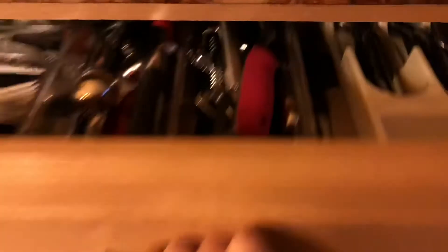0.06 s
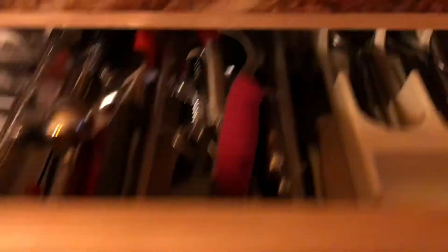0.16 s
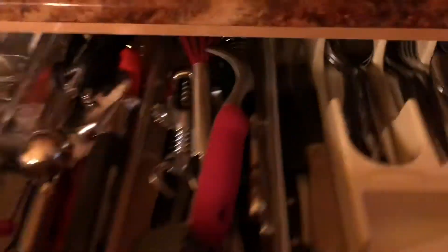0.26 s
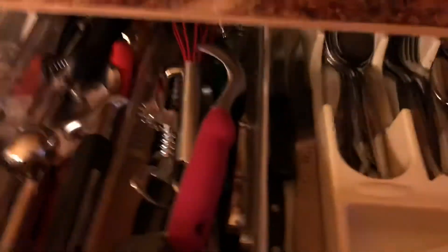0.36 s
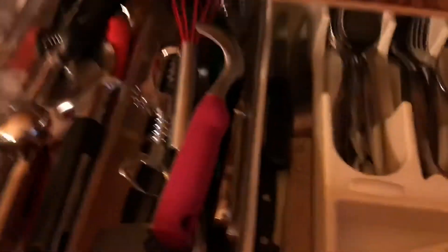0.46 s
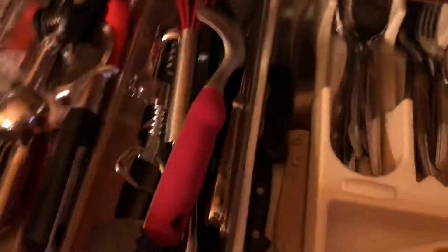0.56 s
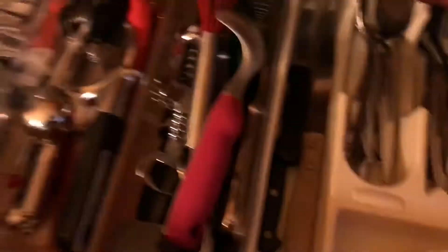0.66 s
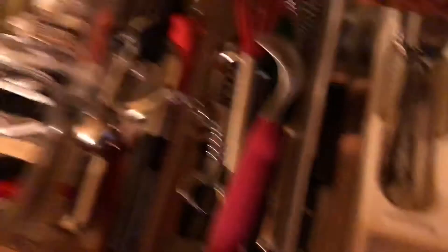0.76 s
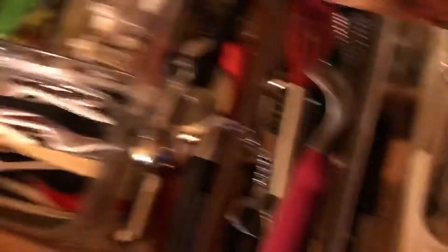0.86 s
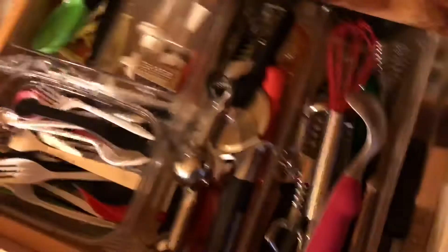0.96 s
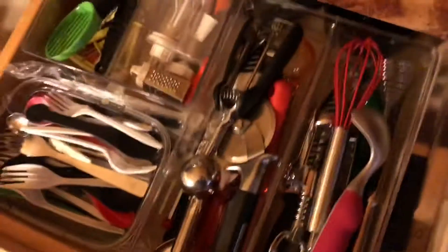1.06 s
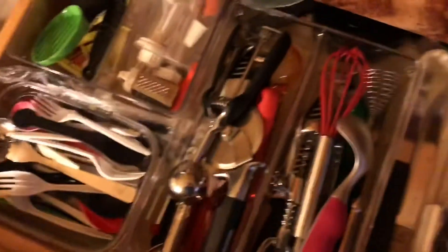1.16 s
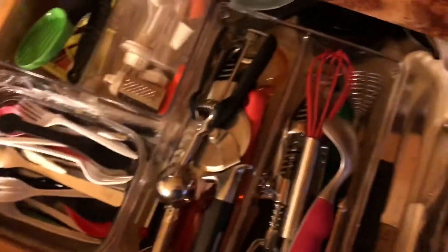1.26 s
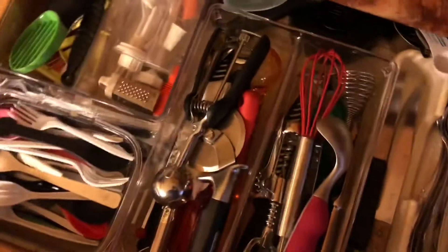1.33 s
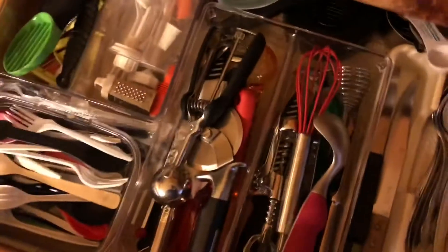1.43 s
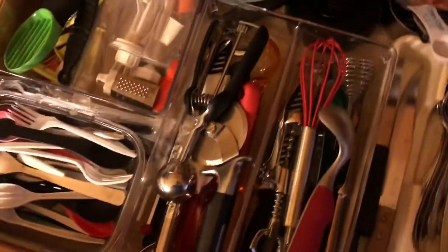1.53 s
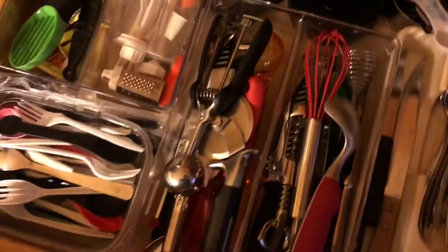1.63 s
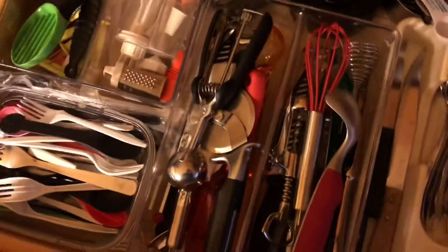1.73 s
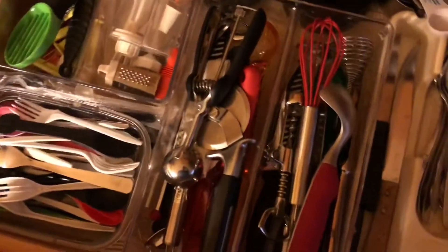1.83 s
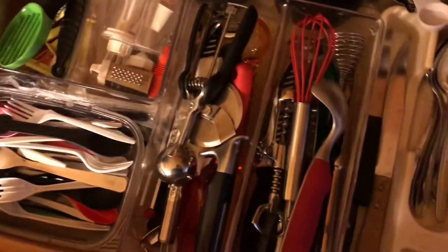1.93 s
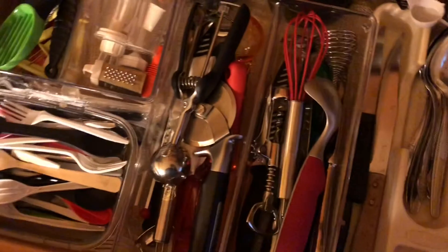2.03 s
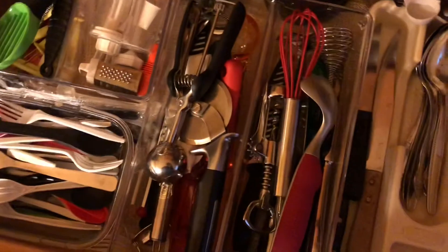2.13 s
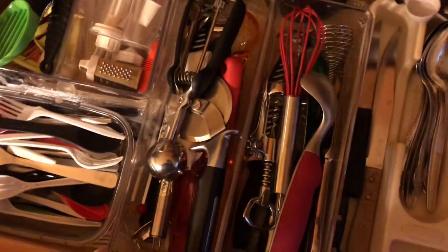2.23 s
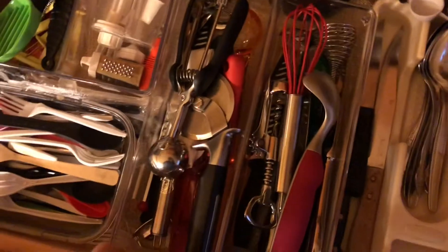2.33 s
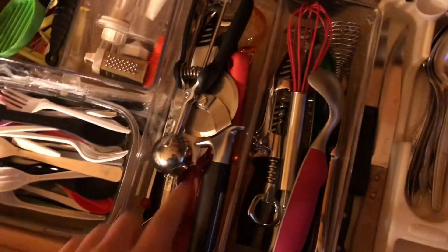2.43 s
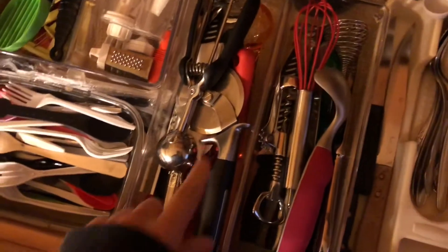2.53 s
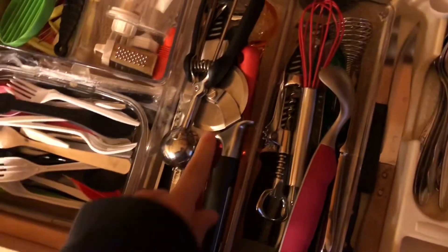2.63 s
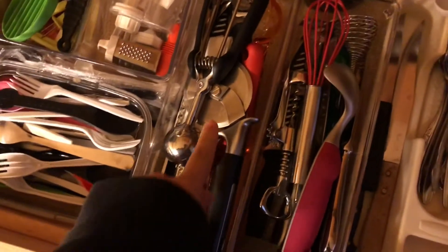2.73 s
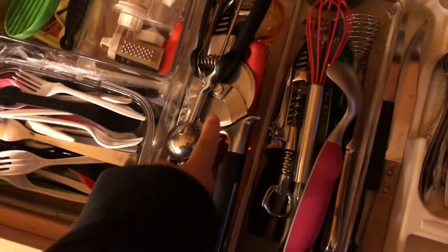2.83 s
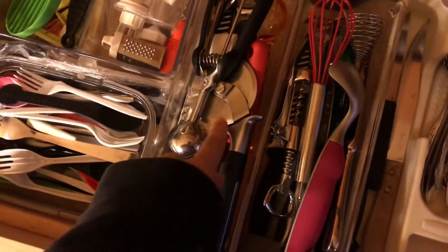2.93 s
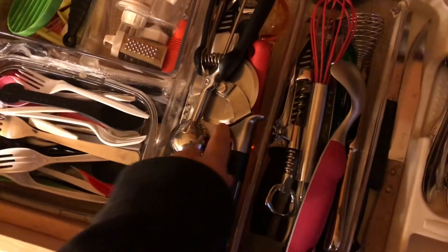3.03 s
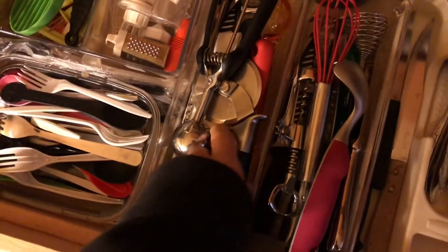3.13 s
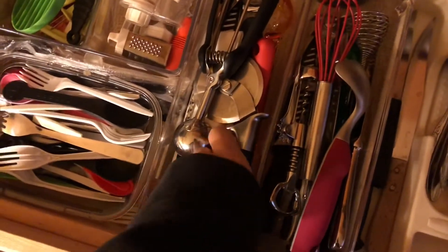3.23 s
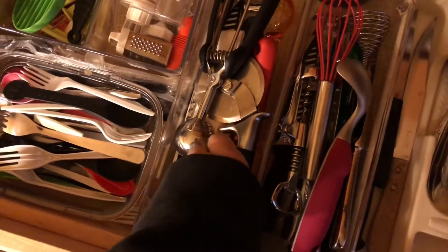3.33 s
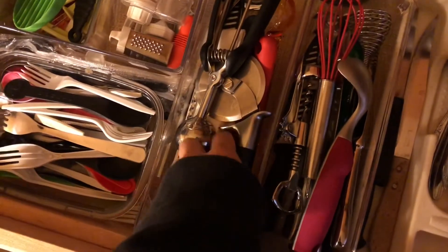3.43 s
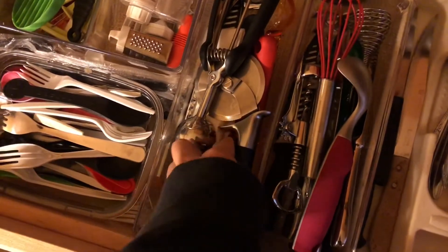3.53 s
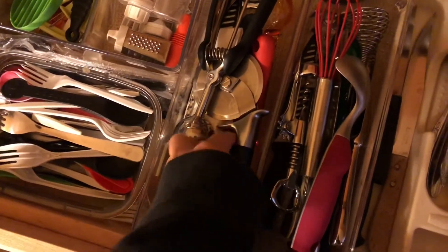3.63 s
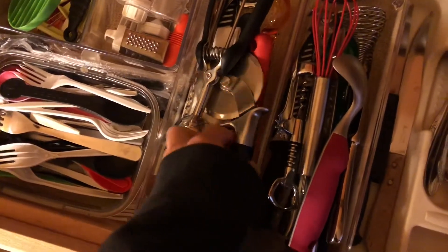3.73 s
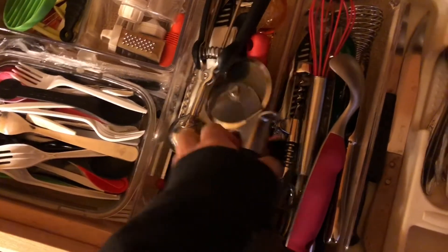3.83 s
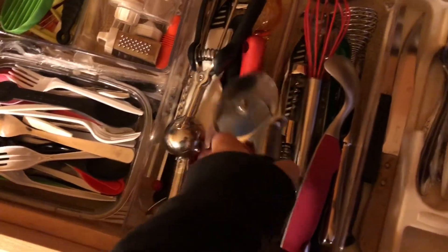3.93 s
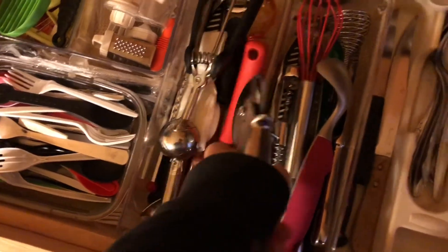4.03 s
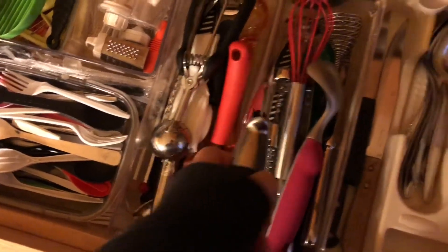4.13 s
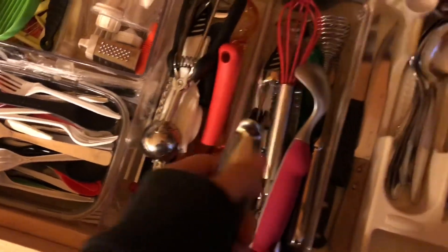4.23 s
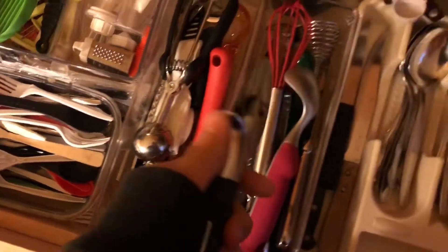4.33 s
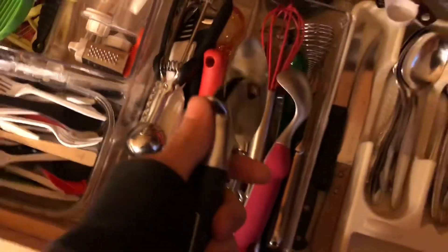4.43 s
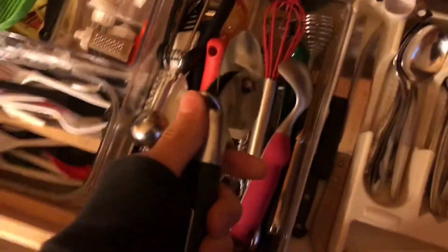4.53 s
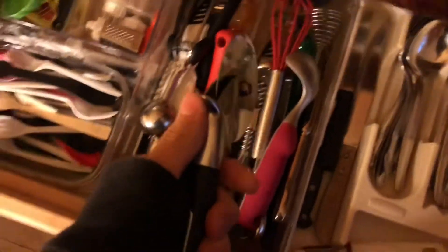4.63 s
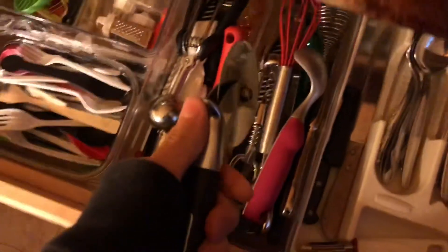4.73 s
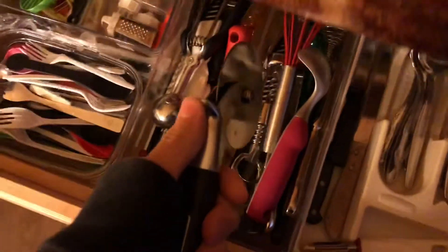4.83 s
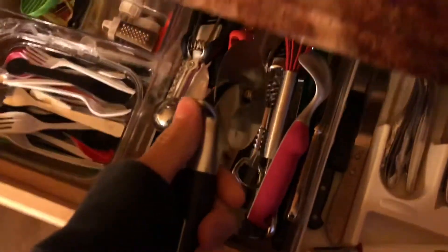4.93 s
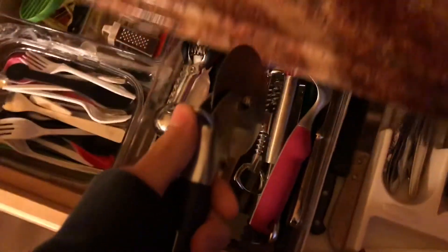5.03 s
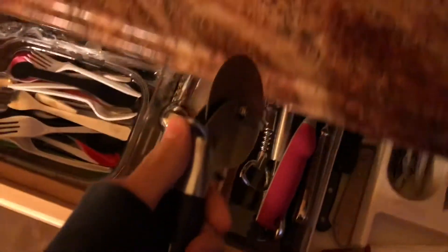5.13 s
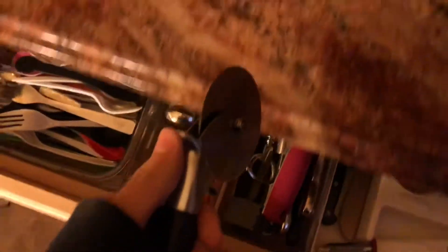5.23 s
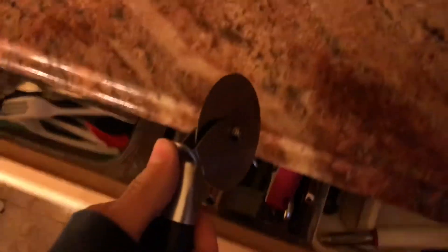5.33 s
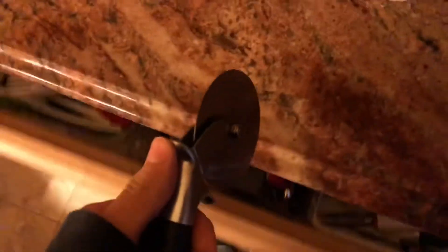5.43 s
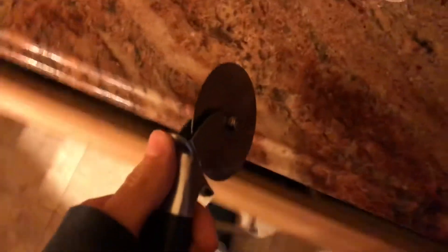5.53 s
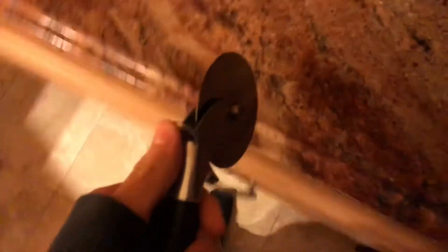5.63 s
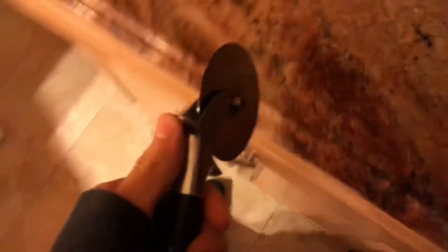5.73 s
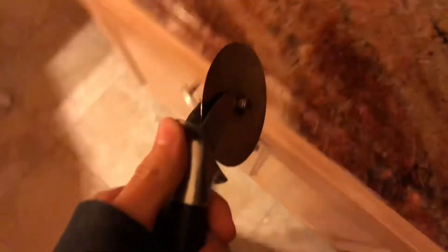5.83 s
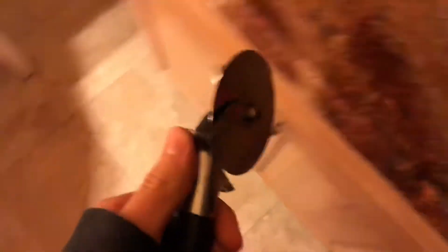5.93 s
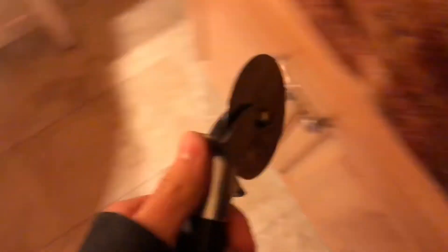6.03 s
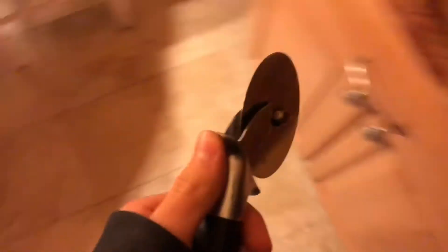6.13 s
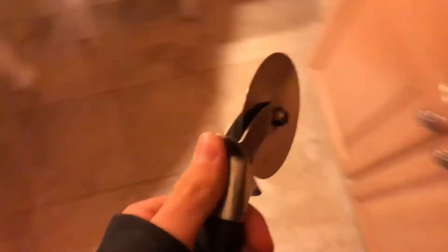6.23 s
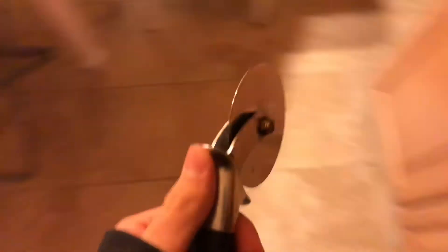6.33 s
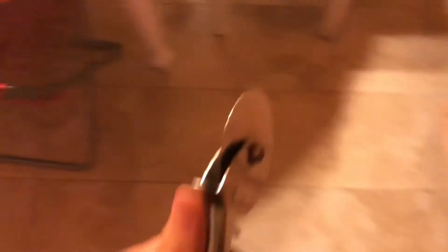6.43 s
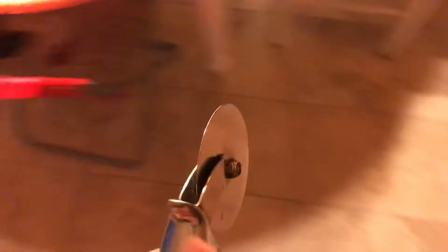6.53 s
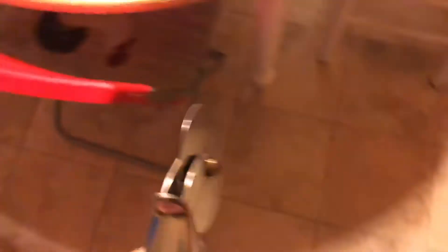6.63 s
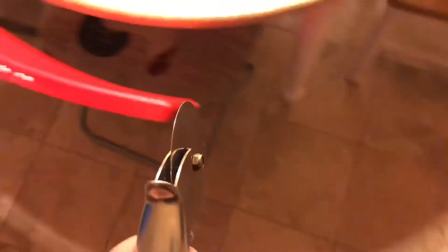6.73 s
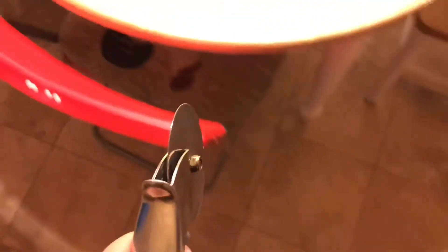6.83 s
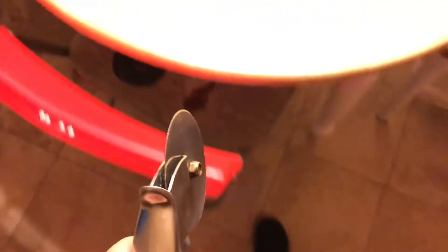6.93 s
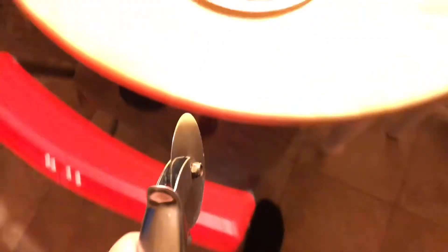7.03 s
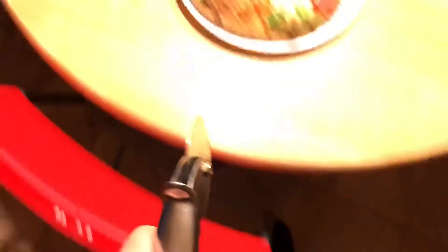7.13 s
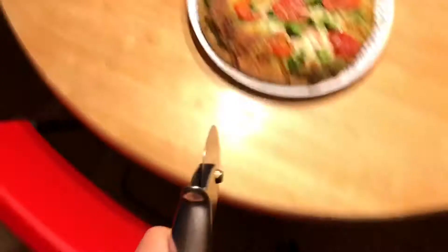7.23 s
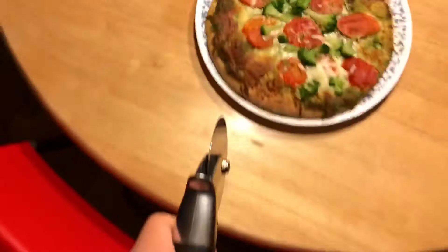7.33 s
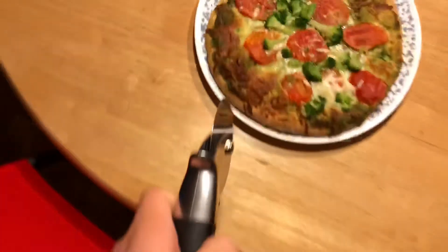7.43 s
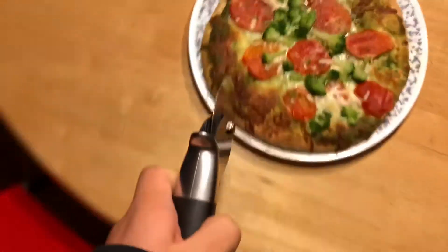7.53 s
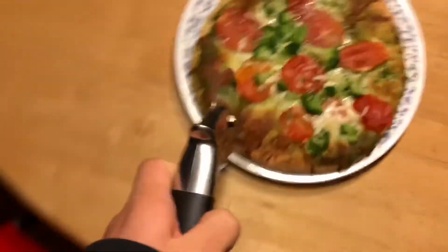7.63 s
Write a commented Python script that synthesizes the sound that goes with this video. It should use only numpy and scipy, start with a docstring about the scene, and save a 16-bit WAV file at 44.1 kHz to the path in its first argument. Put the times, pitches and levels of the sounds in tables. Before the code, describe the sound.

A quiet kitchen with low hum and soft floor booming, heard close up with a short hard-room reverberation. From 0 s a wooden drawer rolls open with rough rumbling and rattling, a sharp knock at about 0.65 s and soft bumps until about 1.5 s. Near-silence follows. At 3.2 to 3.6 s fingers make small clinks and clicks among steel utensils. From 3.8 s the rummaging thickens into bright clatter, peaking in a loud double clash at 4.2 s. A thin steel disc is left ringing, high and clear with a fast shimmer, swelling around 4.5 s and fading slowly until about 7 s. More clinks come at 4.5 to 4.7 s. The drawer rumbles shut, ending in a thud and rattle near 5.75 s. A light, hard shoe step falls at 6.4 s, a duller one at 7.5 s.

```python
"""A wooden kitchen drawer rolls open close by, over the low hum of a quiet kitchen: rubbing is flickering noise.
A hand then digs among steel utensils (noise bursts with damped bodies) and pulls out a cutting wheel, whose thin
disc rings on for seconds and swells as it turns: sinusoidal modes, some in beating pairs. The drawer rolls shut
with a thud and a rattle, then come two shoe steps on tiles. Low noise booms as weight shifts on the floor."""
import sys
import numpy as np
from scipy import signal
from scipy.fft import rfft, irfft, next_fast_len
from scipy.io import wavfile
from scipy.ndimage import uniform_filter1d

SR = 44100
rng = np.random.default_rng(int(sys.argv[2]) if len(sys.argv) > 2 else 0)


def level_to_linear(level):
    """Convert decibel levels to linear amplitude factors, elementwise."""
    exponent = np.asarray(level, float) / 20
    return 10 ** exponent


def generate_wav(sig):
    """Save sig (samples, or channels by samples) to the path in sys.argv[1] as 16-bit PCM at SR."""
    pcm = np.round(np.clip(np.atleast_2d(sig).T, -1, 1) * 32767).astype(np.int16)
    wavfile.write(sys.argv[1], SR, pcm)


N = 337806
T = np.arange(N) / SR  # time in s


def unit(x):
    """Normalization: divide by the root mean square, leaving rms 1."""
    return x / np.sqrt(np.mean(x ** 2))


def band(x, lo_hz, hi_hz):
    """Band limitation: a Butterworth band-pass keeps one range of frequencies."""
    sos = signal.butter(2, [lo_hz, min(hi_hz, .45 * SR)], "band", fs=SR, output="sos")
    return signal.sosfilt(sos, x)


def colour(x, points):
    """Spectral shaping: weight the spectrum by (f/Hz, level/dB) points, then normalize to rms 1."""
    hz, db = np.transpose(points)
    size = next_fast_len(len(x))
    bin_hz = np.arange(size // 2 + 1) * SR / size
    gain = level_to_linear(np.interp(np.log(bin_hz + 1), np.log(hz), db))  # + 1 avoids log(0)
    return unit(irfft(rfft(x, size) * gain, size)[:len(x)])


def curve(rows, column):
    """Amplitude envelope: a level column as gain over time, silent outside its span, smoothed over 10 ms."""
    rows = np.array(rows)
    level_db = np.interp(T, rows[:, 0], rows[:, column], left=-150, right=-150)
    return uniform_filter1d(level_to_linear(level_db), size=SR // 100)


def walk(rate):
    """Slow random modulation: levels drawn rate times a second, averaged twice over one step, rms 1."""
    k = int(SR / rate)
    held = np.repeat(rng.standard_normal(N // k + 1), k)
    return unit(uniform_filter1d(uniform_filter1d(held, k), k)[:N])


def add(track, s, sound, db):
    """Linear superposition: add a sound at time s, scaled so that its peak is db."""
    i = int(s * SR)
    sound = sound[:N - i]
    track[i:i + len(sound)] += level_to_linear(db) * sound / np.max(np.abs(sound))


def catches(rate, spread_db):
    """Stick-slip friction: dense small catches of uneven size, as noise whose level flickers at two rates."""
    return rng.standard_normal(N) * level_to_linear(spread_db * walk(rate) + spread_db * walk(8 * rate))


def rubbing():
    """Friction noise by frequency range: rollers rumble in the wood, loose things rattle, surfaces hiss."""
    # drawer runners, sleeve and shoes rubbing, in two passages:
    # t/s, rumble level/dB, rattle level/dB, hiss level/dB
    rub_passages = [
        [(0, -45.5, -50, -59.5), (.38, -51, -59.5, -61.5), (.46, -54.5, -65, -68.5), (.7, -61.5, -62.5, -71),
         (.85, -55, -68, -67), (1.0, -49.5, -67.5, -67.5), (1.2, -57, -61, -67), (1.33, -64, -81.5, -68.5),
         (1.52, -68, -60.5, -77.5), (1.68, -86, -91, -80)],
        [(3.69, -68, -68.5, -76), (3.78, -49.5, -54.5, -67), (3.84, -53, -39, -48.5), (3.95, -59.5, -56, -46),
         (4.17, -46, -40, -60), (4.27, -55.5, -42, -57), (4.42, -70, -71.5, -90), (4.5, -57, -61, -62),
         (4.58, -43.5, -49, -49.5), (4.72, -50, -69, -72), (4.95, -51.5, -67.5, -72), (5.22, -47.5, -47, -68),
         (5.42, -47.5, -62, -69), (5.68, -55, -70, -69.5), (5.78, -40.5, -46, -52), (5.88, -56, -54.5, -56.5),
         (6.0, -78.5, -76.5, -79), (6.35, -72, -74.5, -72.5), (6.6, -64, -61.5, -72), (7.05, -71, -88.5, -70),
         (7.45, -77, -72, -72.5), (7.66, -51, -58, -62)],
    ]
    # colour of the rolling drawer: f/Hz, relative level/dB
    rumble_colour = [(29, -47), (50, -18), (92, -9.5), (302, 2), (418, -3.5), (800, -13.5), (1040, -10),
                     (1760, -120)]
    # colour of the hissing surfaces: f/Hz, relative level/dB
    hiss_colour = [(1400, -4), (2500, 3.5), (6000, -0.5), (16000, -6.5)]
    rumble = colour(catches(20, spread_db=1.0), rumble_colour)
    rattle = unit(band(band(catches(25, spread_db=2.24), 480, 1360), 400, 1750))
    hiss = colour(catches(30, spread_db=1.5), hiss_colour)
    return sum(curve(r, 1) * rumble + curve(r, 2) * rattle + curve(r, 3) * hiss for r in rub_passages)


def kitchen_hum():
    """Stationary coloured noise under slow amplitude modulation: the low hum of a quiet kitchen."""
    # colour of the kitchen hum: f/Hz, relative level/dB
    hum_colour = [(18, -51), (30, -53), (48, -5), (70, -8.5), (157, -3), (174, -10.5), (374, -14.5),
                  (632, -23.5), (16000, -39)]
    level_db = -68.5 + 2.4 * walk(1.3)
    return colour(rng.standard_normal(N), hum_colour) * level_to_linear(level_db)


def floor_boom():
    """Low-frequency forced response: the floor booms under shifting weight, as band-limited noise."""
    # course of the boom: t/s, level/dB
    boom_course = [(0, -66), (.6, -58.5), (1.5, -60), (2, -86.5), (5.4, -76), (5.8, -59), (6.3, -64.5),
                   (7.66, -64.5)]
    boom = unit(band(rng.standard_normal(N), 45, 210))
    return curve(boom_course, 1) * boom * level_to_linear(2.2 * walk(4.1))


def knocks():
    """Impact excitation: a short ragged burst gives a crack, a bright tick and the struck thing's damped body."""
    # knocks and clinks: t/s, crack peak level/dB, bright tick peak level/dB, body level/dB, body f/Hz, crack t60/s
    clinks = [(0.3536, -46, -67, -44, 272, 0.046), (0.5004, -53, -64, -39, 332, 0.1),
              (0.5184, -55, -71, -31.5, 293, 0.024), (0.5472, -54, -57, -31, 514, 0.07),
              (0.6386, -44, -63, -35, 1290, 0.042), (0.6489, -28.5, -40.5, -50, 920, 0.02),
              (0.7677, -40, -76, -53, 310, 0.017), (1.0982, -44.5, -75, -46, 218, 0.037),
              (1.496, -45.5, -69, -46.5, 207, 0.013), (1.5469, -49.5, -65, -49, 215, 0.064),
              (3.1749, -58, -50, -40.5, 690, 0.077), (3.1854, -58, -58, -39, 930, 0.061),
              (3.197, -41, -43.5, -32, 377, 0.016), (3.2475, -43.5, -50, -40, 1160, 0.018),
              (3.3214, -77, -85, -46.5, 457, 0.023), (3.4876, -46.5, -41.5, -43, 1200, 0.095),
              (3.5008, -43, -49, -57, 147, 0.035), (3.5144, -46, -47, -44.5, 358, 0.069),
              (3.554, -43, -40.5, -44, 970, 0.051), (3.6257, -49.5, -58, -54.5, 148, 0.054),
              (3.7998, -43.5, -50, -39, 694, 0.044), (3.8544, -37, -64, -23.5, 813, 0.031),
              (3.8672, -29.5, -24, -30.5, 376, 0.034), (3.9794, -34, -35, -36.5, 1030, 0.054),
              (4.0058, -32, -30, -29, 1150, 0.053), (4.0248, -26, -24.5, -38, 930, 0.021),
              (4.0378, -47, -38, -22.5, 352, 0.058), (4.0595, -30, -27, -28.5, 350, 0.015),
              (4.0988, -44, -32, -23, 345, 0.11), (4.1051, -28, -30.5, -13, 800, 0.03),
              (4.1389, -33.5, -35.5, -33, 480, 0.042), (4.1535, -26, -44.5, -24, 410, 0.04),
              (4.1744, -28, -40, -22, 757, 0.039), (4.2023, -13, -27, -14, 865, 0.017),
              (4.2074, -30, -15, -14.5, 1040, 0.018), (4.527, -30.5, -32.5, -32.5, 355, 0.023),
              (4.5397, -32, -34, -40, 330, 0.049), (4.5621, -33, -28, -33.5, 293, 0.042),
              (4.6064, -37, -29, -50, 291, 0.035), (4.7224, -36, -55, -63, 350, 0.018),
              (5.7284, -43, -47, -38, 310, 0.087), (5.755, -31.5, -51, -36, 340, 0.027),
              (5.7658, -29, -46, -30, 240, 0.029), (5.8252, -34, -43, -39, 132, 0.039),
              (6.5296, -41.5, -72, -45, 436, 0.021)]
    # drawer slam and shoes, same columns
    slam_and_shoes = [(5.765, -38.5, -63, -33.5, 131, 0.44), (6.421, -40, -47.5, -41, 1240, 0.55),
                      (7.502, -49.5, -68, -40, 148, 0.23), (7.533, -33, -58, -33, 145, 0.33)]
    out, t = np.zeros(N), T[:SR // 2]
    for s, crack_db, tick_db, body_db, hz, t60 in clinks + slam_and_shoes:
        # longer contacts also build up more slowly
        rise_s = 0.018 * t60 + 0.00069
        fade_db = -60 * t / t60 + 20 * np.log10(np.minimum(t / rise_s, 1) + 1e-6)
        noise = rng.standard_normal((3, len(t)))
        add(out, s, band(noise[0] * level_to_linear(fade_db), 890, 4500), crack_db)
        add(out, s, band(noise[1] * level_to_linear(0.82 * fade_db), 5500, 13500), tick_db)
        # the body outlasts the contact by its own short ring: t60 + 0.048 s
        thud = noise[2] * level_to_linear(fade_db * t60 / (t60 + 0.048))
        narrow = band(thud, hz * 0.827, hz * 1.163)
        broad = band(thud, hz * 0.18, hz * 2.35)
        add(out, s, narrow + 0.42 * broad, body_db)
    return out


def room(x):
    """Reverberation: convolution with the dense tail of a small hard room, which loses its treble first."""
    t60_s, tail_db = 0.41, -15.5
    t = T[:SR // 2]
    noise = rng.standard_normal((2, len(t)))
    low_tail = band(noise[0], 80, 1800) * level_to_linear(-60 * t / t60_s)
    treble_tail = band(noise[1], 2500, 11000) * level_to_linear(-60 * t / (0.65 * t60_s))
    tail = (low_tail + treble_tail) * np.minimum(t / 0.011, 1)  # builds up over 11 ms
    tail /= np.sqrt(np.sum(tail ** 2))  # unit energy
    return x + level_to_linear(tail_db) * signal.fftconvolve(x, tail)[:N]


def ring(modes, t):
    """Modal superposition: exponentially decaying sinusoids, struck a little differently each time."""
    hz, db, t60 = np.transpose(modes)[:, :, None]
    level_db = db + rng.standard_normal(db.shape) - 60 * t / t60
    return np.sum(level_to_linear(level_db) * np.sin(2 * np.pi * hz * t), 0)


def disc():
    """Modal beating: near-equal mode pairs of the steel disc interfere; a shaky hand makes the lower ones waver."""
    # blows on the disc: t/s, peak level/dB
    blows = [(3.868, -25), (4.024, -38), (4.205, -36)]
    # quickly dying high modes of the disc: f/Hz, mean relative level/dB, t60/s
    top_modes = [(11390, -8, .1), (12160, -8, .07), (12410, 0, .16), (15710, -5, .19)]
    # long ring as the disc turns and fades: t/s, low mode level/dB, upper partner of middle pair level/dB
    long_ring = [(4.22, -67, -62), (4.33, -60, -48.5), (4.47, -53.5, -43), (4.7, -54, -49),
                 (5.2, -60.5, -52.5), (5.4, -65, -58.5), (5.65, -66, -60.5), (5.95, -61.5, -61),
                 (6.35, -66.5, -68), (6.65, -65.5, -72.5), (7.1, -76, -74.5), (7.45, -85, -85.5)]
    # ring of the high pair: t/s, stronger partner level/dB
    high_ring = [(4.215, -53), (4.235, -43), (4.4, -52.5), (4.7, -74)]
    low_hz, mid_hz, high_hz = 2023, 4494, 7670
    mid_split_hz, high_split_hz = -22, 18.5  # offset of each pair's second partner
    in_phase_s = 4.24  # the unmodulated tones all crest together here

    def tone(hz):
        """Simple harmonic motion: a steady sinusoid of rms 1."""
        return np.sqrt(2) * np.cos(2 * np.pi * hz * (T - in_phase_s))

    out = np.zeros(N)
    for s, db in blows:
        add(out, s, ring(top_modes, T[:SR // 2]), db)
    out += curve(long_ring, 1) * tone(low_hz) * level_to_linear(.9 * walk(6))
    # the lower partner of the middle pair dies more slowly: it gains 2.2 dB/s on the upper
    partner_db = -16 + 2.2 * (T - long_ring[0][0]) + 2.5 * walk(8)
    partner = level_to_linear(partner_db) * tone(mid_hz + mid_split_hz)
    out += curve(long_ring, 2) * (level_to_linear(0.37 * walk(8)) * tone(mid_hz) + partner)
    high_pair = tone(high_hz) + level_to_linear(-7.5) * tone(high_hz + high_split_hz)
    return out + curve(high_ring, 1) * high_pair


def scene():
    """Superposition of sources: only the knocks excite the room; the other layers are added dry."""
    mix = rubbing() + kitchen_hum() + floor_boom() + room(knocks()) + disc()
    return mix[None]  # one channel


def roll_off(x):
    """The treble ends steeply here."""
    return signal.sosfilt(signal.butter(12, 16880, fs=SR, output="sos"), x)


def record(dry):
    """Low-pass filtering: the phone cuts the top with a steep elliptic filter at 15.9 kHz."""
    low_pass = signal.ellip(8, .2, 60, 15900, fs=SR, output="sos")  # ripple .2 dB, stop band -60 dB
    finished = signal.sosfilt(low_pass, dry)
    return roll_off(finished)


dry = scene()
out = record(dry)
generate_wav(out)
```